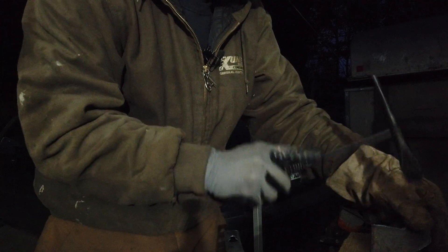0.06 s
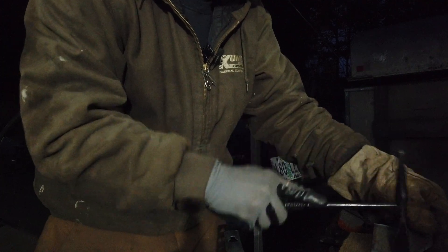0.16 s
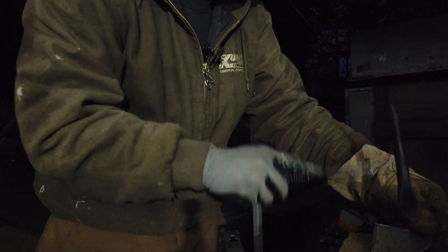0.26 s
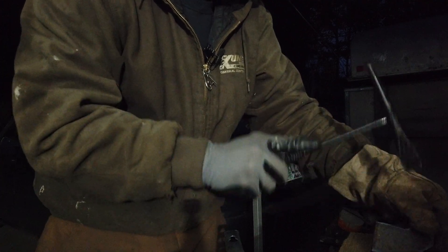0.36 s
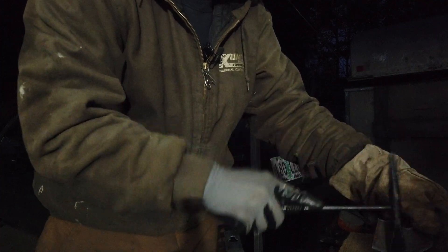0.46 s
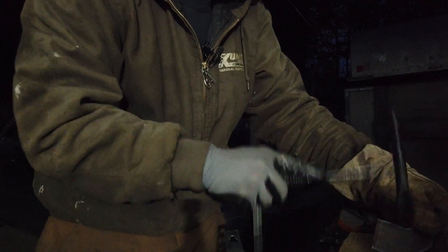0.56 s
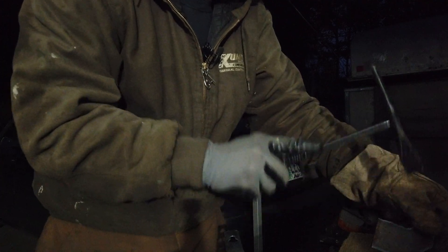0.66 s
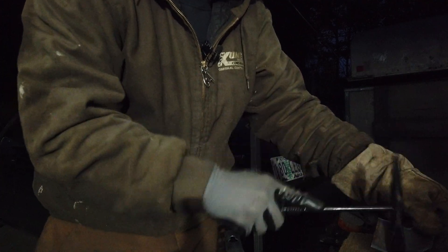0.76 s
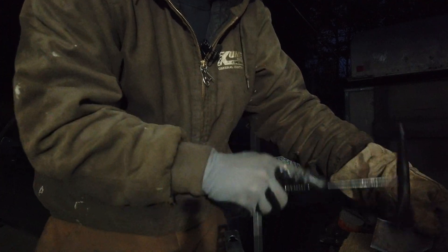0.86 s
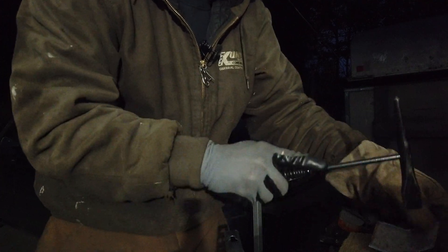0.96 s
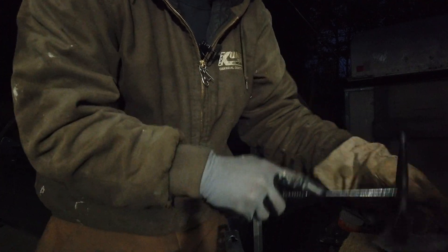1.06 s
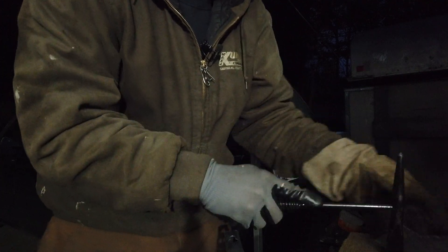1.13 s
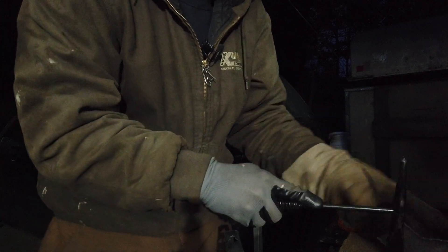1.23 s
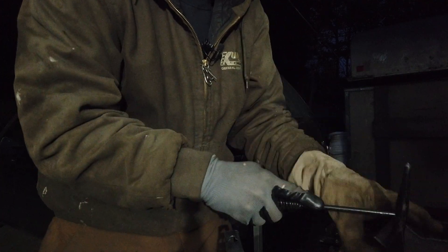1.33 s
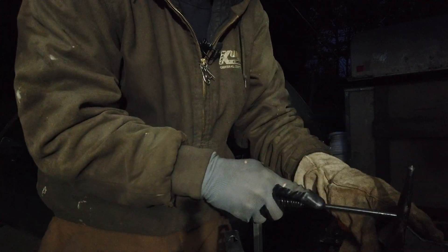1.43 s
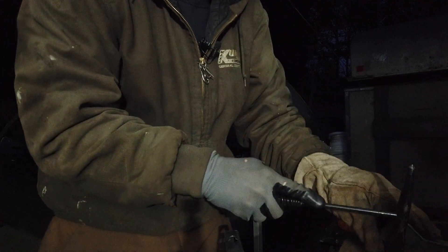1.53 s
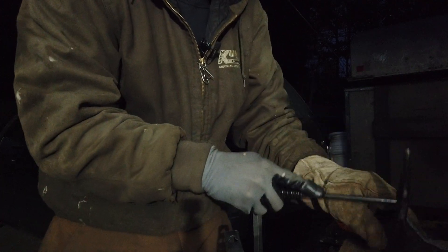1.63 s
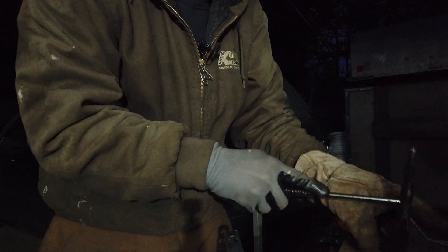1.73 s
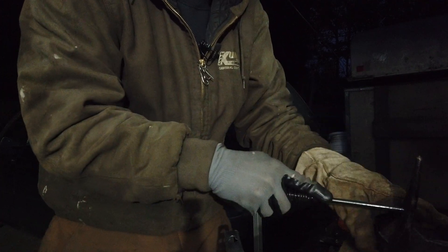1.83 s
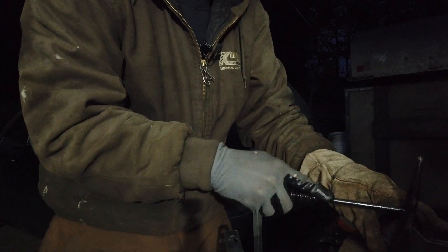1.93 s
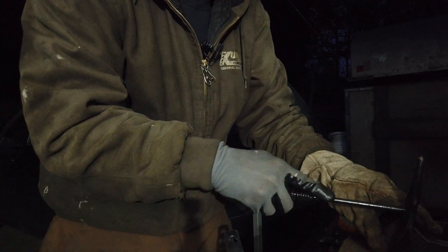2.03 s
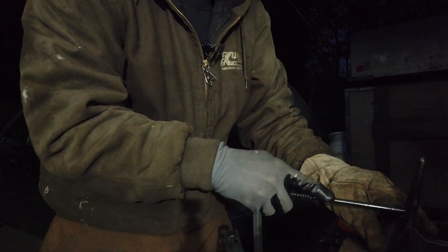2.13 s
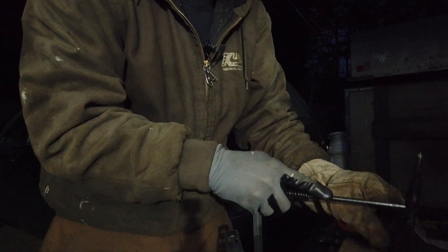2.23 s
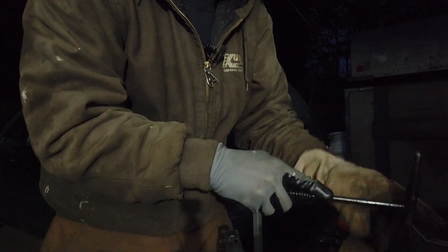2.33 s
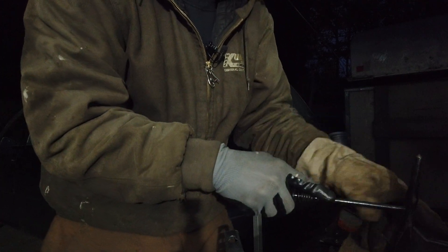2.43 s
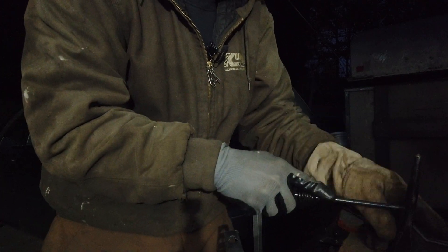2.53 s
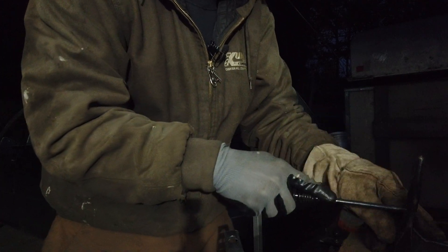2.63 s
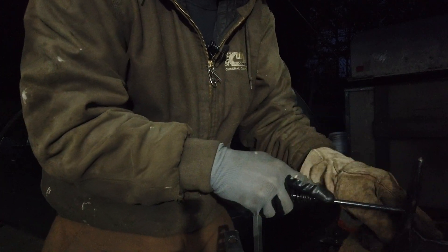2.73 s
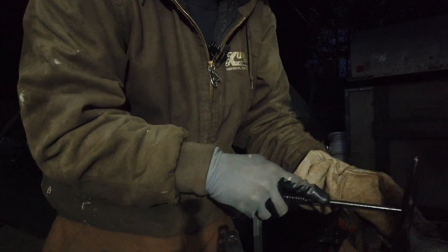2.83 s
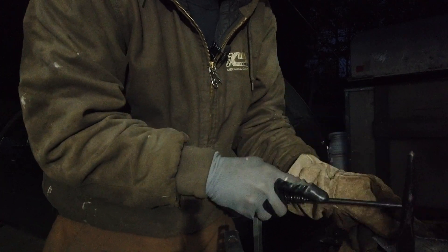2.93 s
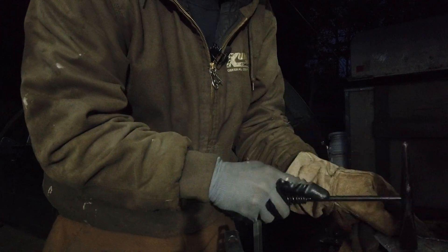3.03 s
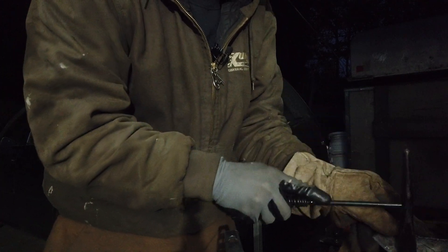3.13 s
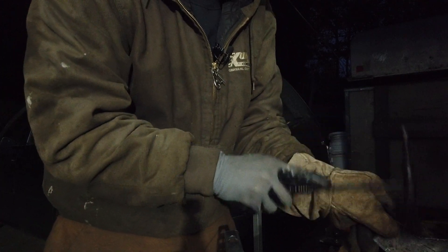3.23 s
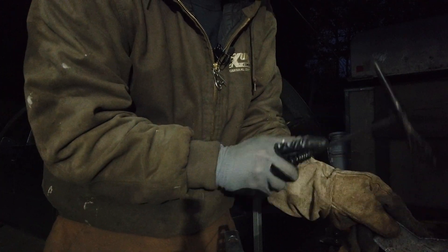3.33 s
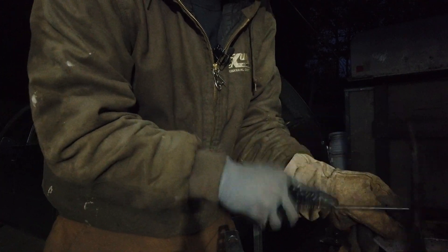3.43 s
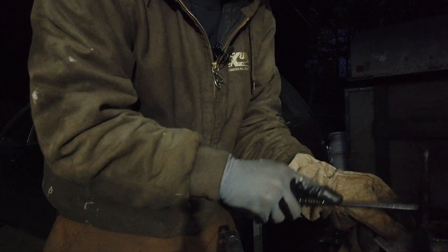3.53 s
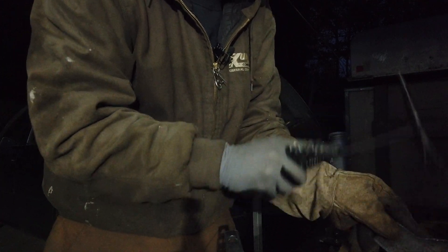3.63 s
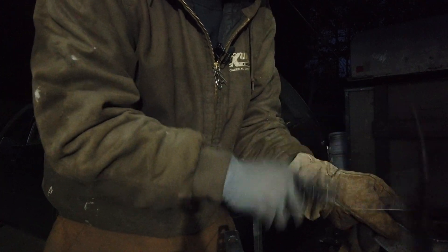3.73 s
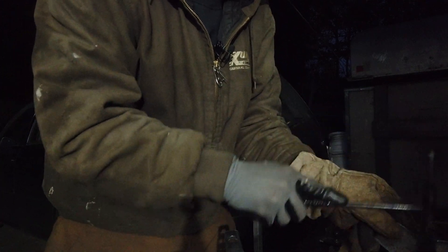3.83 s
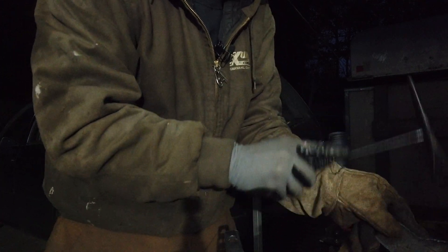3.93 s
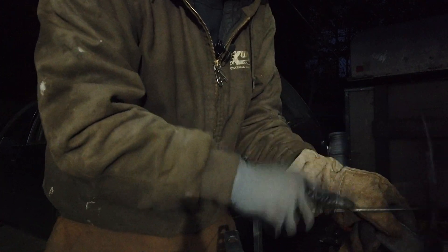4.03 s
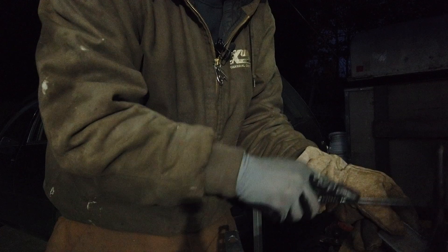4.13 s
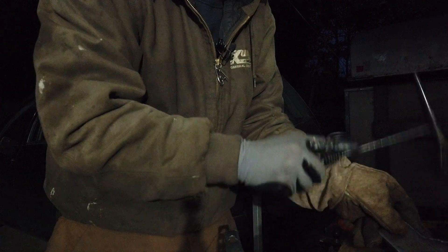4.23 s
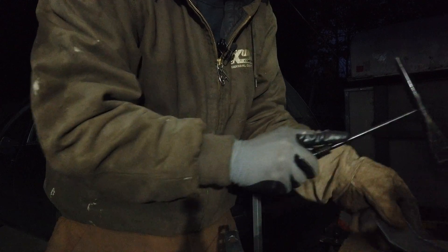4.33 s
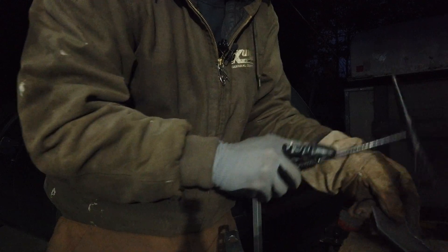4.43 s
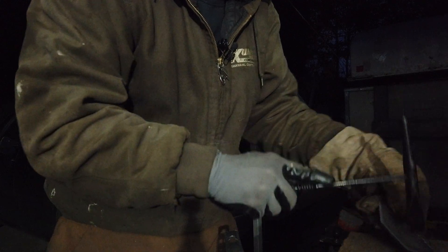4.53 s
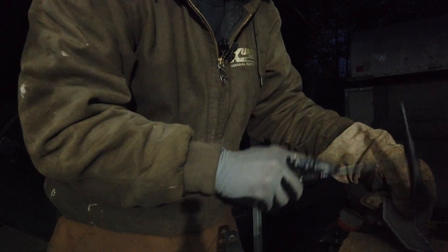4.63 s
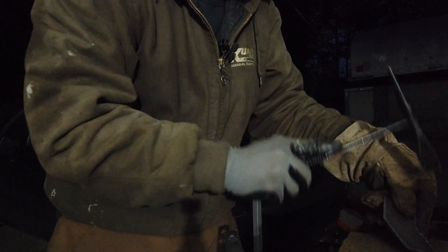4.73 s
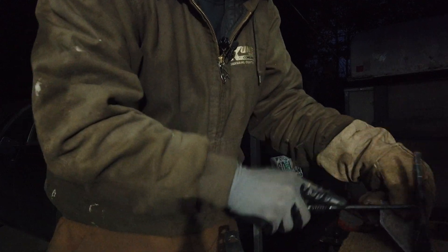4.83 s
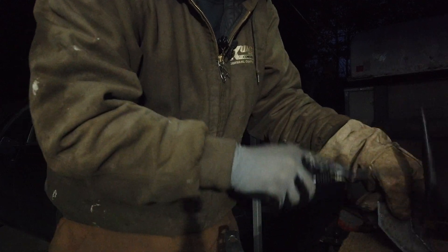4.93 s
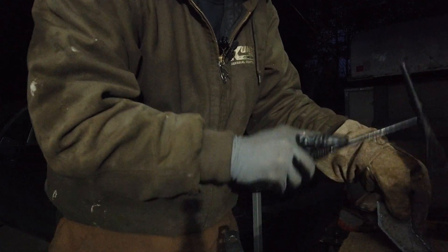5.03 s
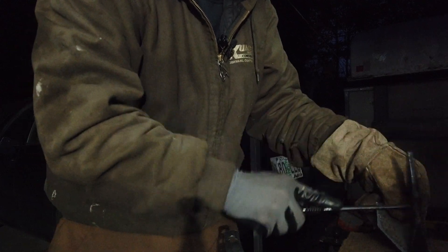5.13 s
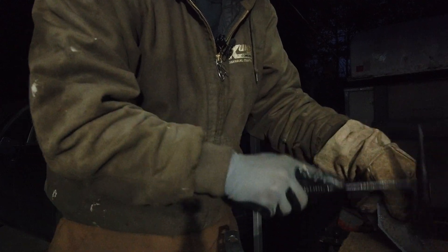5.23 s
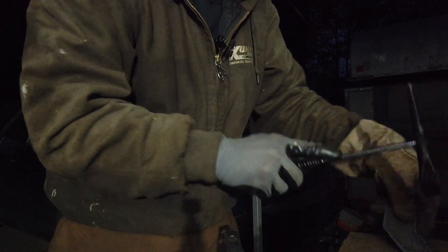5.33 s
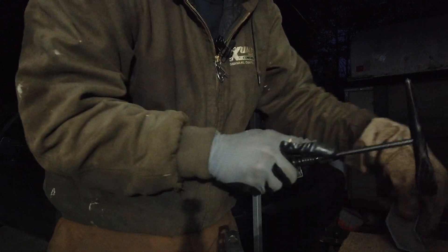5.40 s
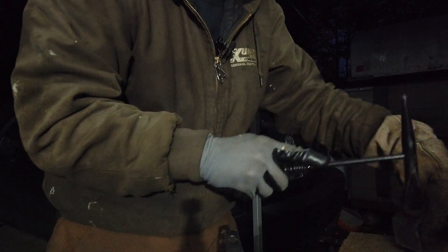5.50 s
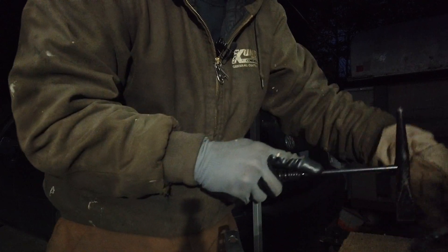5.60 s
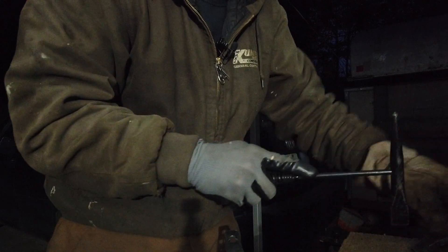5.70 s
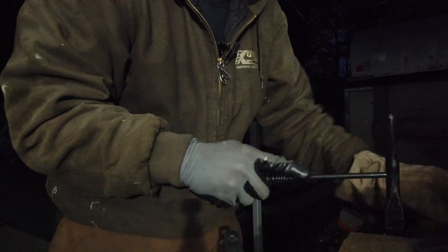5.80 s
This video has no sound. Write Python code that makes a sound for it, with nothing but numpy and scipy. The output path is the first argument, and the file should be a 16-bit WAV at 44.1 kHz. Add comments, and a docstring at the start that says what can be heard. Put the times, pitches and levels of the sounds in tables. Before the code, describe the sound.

Close to the microphone in a small workshop, a steel hammer cracks against a metal plate on a bench: three quick, knocking blows, then a lighter ringing one. A pause holds tiny ticks and glove scuffs, then a brighter clink leads into three louder, evenly spaced strikes, a short gap and two more. Faint hum, rumble and hiss sit underneath.

```python
"""A steel chipping hammer strikes the edge of a cut plate held on a bench in a small workshop.
Each blow is a burst of shaped noise (the crack), fading sine tones (the hammer head), and a knock and chatter
of plate and bench; the head's lowest tones fade faster once it touches the work again.
Between the heavy blows come light touches, and a glove's scuffs with a tap and a low knock, of gritty noise.
A faint wavering hum, rumble, air and hiss fill the room; the microphone is close."""
import sys
import numpy as np
from scipy import signal
from scipy.fft import rfft, irfft
from scipy.io import wavfile
from scipy.ndimage import uniform_filter1d, minimum_filter1d, map_coordinates

SR = 44100
rng = np.random.default_rng(int(sys.argv[2]) if len(sys.argv) > 2 else 0)


def file_out(sig):
    """Save sig as 16-bit WAV at sys.argv[1]."""
    # one column per channel
    cols = np.atleast_2d(sig).T
    # limit, then scale
    lim = np.clip(cols, -1, 1)
    pcm = np.round(lim * 32767).astype(np.int16)
    wavfile.write(sys.argv[1], SR, pcm)


def field_ratio(decibels):
    """Amplitude ratio for a level in dB (20 dB per decade); scalars and array-likes work."""
    return 10 ** (np.asarray(decibels, dtype=float) / 20)


N = 258426


def unit(x):
    """Scaled to rms 1."""
    return x / np.sqrt(np.mean(x ** 2) + 1e-20)


def curves(rows):
    """One value per sample for each column after the time."""
    s, *cols = np.transpose(rows)
    return [np.interp(np.arange(N) / SR, s, c) for c in cols]


def along(points, hz):
    """Reads a curve of (Hz, value) points on a log frequency axis."""
    f, v = np.transpose(points)
    return np.interp(np.log(hz + 1), np.log(f + 1), v)


def noise(points, size):
    """Noise of rms 1 whose spectrum has the given shape."""
    hz = np.fft.rfftfreq(size, 1 / SR)
    spectrum = rfft(rng.standard_normal(size)) * field_ratio(along(points, hz))
    return unit(irfft(spectrum, size))


def wobble(rate):
    """A smooth random curve through rate random points a second."""
    points = rng.standard_normal(int(N * rate / SR) + 4)
    return map_coordinates(points, [np.arange(N) * rate / SR])


def hiss():
    """Broad patchy hiss with narrow bands that come and go."""
    # shape of the broad hiss: f/Hz, level/dB per Hz
    hiss_shape = [(1760, -40.5), (3000, -12), (3340, -5.5), (4400, -6), (4720, 0), (5030, 0.5), (5920, 0),
                  (6400, 1.5), (7270, 2.5), (9380, -4), (11900, -1.5), (14300, -5.5), (15200, -2),
                  (15750, 0), (16000, -45.5)]
    # narrow bands standing out of the hiss: f/Hz, width/Hz, typical level/dB
    whistles = [(5126, 92, -8), (6530, 34, -7), (7204, 53, 0.5), (8200, 77, -5), (12600, 35, -12),
                (12200, 61, -5.5), (15200, 53, -21), (15400, 100, -11)]
    bands = 0
    for hz, width, db in whistles:
        shape = [(hz - 3 * width, -40), (hz - width / 2, -3), (hz + width / 2, -3), (hz + 3 * width, -40)]
        bands = bands + field_ratio(db + 4.1 * wobble(3.5)) * noise(shape, N)
    z = signal.stft(noise(hiss_shape, N) + field_ratio(-11.5) * bands, nperseg=256)[2]
    # random louder and softer patches, smoothed over frequency and then over time
    patches = uniform_filter1d(rng.standard_normal(z.shape), size=3, axis=0)
    patches = uniform_filter1d(patches, size=16, axis=1)
    patchy = signal.istft(z * field_ratio(2.2 * unit(patches)), nperseg=256)[1]
    return unit(patchy[:N])


def machine_hum():
    """A tone and its octave, wavering in pitch and level."""
    # machine hum: t/s, typical level/dB
    hum_levels = [(0, -64), (2.2, -65), (2.5, -54), (2.8, -78), (3.1, -59.5), (3.3, -50.5), (3.8, -53),
                  (4.4, -73.5), (4.55, -60), (5.2, -57.5), (5.35, -62.5), (5.86, -63)]
    (hum_db,) = curves(hum_levels)
    hum_hz = 102.7 + 1.2 * wobble(3.9)
    turn = 2 * np.pi * np.cumsum(hum_hz) / SR
    return field_ratio(hum_db + 1.8 * wobble(16)) * (np.sin(turn) + field_ratio(-12.5) * np.sin(2 * turn))


def background():
    """Rumble, air and hiss rise and fall together under the hum; part of the hiss differs left and right."""
    # overall swing of the shop noise: t/s, level/dB
    floor_levels = [(0, -60), (1, -61), (1.7, -59.5), (2.8, -57), (3.43, -54), (3.65, -56.5), (3.95, -63),
                    (5.86, -62)]
    # shape of the rumble: f/Hz, level/dB per Hz
    rumble_shape = [(12, -40), (20, -18.5), (59, 9.5), (135, -0.5), (195, 3), (242, -5), (500, -27),
                    (650, -53.5), (1100, -120)]
    # shape of the air noise: f/Hz, level/dB per Hz
    air_shape = [(150, -24.5), (250, -1), (504, -10.5), (923, -8.5), (1230, -15), (2550, -24.5),
                 (4500, -29), (5850, -47), (9900, -120)]
    # shape of the hiss that differs left and right: f/Hz, level/dB per Hz
    side_shape = [(880, -80.5), (1500, -50), (2940, -31.5), (3220, -8), (7930, -1.5), (14500, -6),
                  (16000, -10.5), (16500, -30.5)]
    (level_db,) = curves(floor_levels)
    rumble = field_ratio(0.5 + 2.8 * wobble(3.9)) * noise(rumble_shape, N)
    # the air swings wider than the rest: 0.4 dB extra per dB
    air_db = -4 + 0.4 * (level_db - level_db.mean()) + 2.4 * wobble(6.6)
    air = field_ratio(air_db) * noise(air_shape, N)
    hiss_swing = field_ratio(0.76 * wobble(2.9))
    mid = hiss_swing * hiss()
    side = hiss_swing * field_ratio(-6.5) * noise(side_shape, N)
    return machine_hum() + field_ratio(level_db) * (rumble + air + mid + np.array([side, -side]))


def scuffs():
    """Scuffs, with a short tap and a low knock among them: short gritty noises round a broad resonance."""
    # scuffs, a tap (3.18 s) and a low knock (5.706 s): t/s, relative level/dB, centre f/Hz, length/s
    scuffs_and_taps = [(1.107, -49.5, 1270, 0.097), (1.338, -44, 390, 0.013), (1.557, -42, 1075, 0.019),
                       (1.725, -46.5, 2150, 0.033), (2.3, -48.5, 2820, 0.039), (2.511, -46, 2000, .034),
                       (2.876, -46, 1157, 0.0055), (2.887, -41, 1256, 0.016), (2.947, -46.5, 1534, 0.038),
                       (3.18, -30.5, 1227, 0.0062), (3.195, -39.5, 1190, 0.015), (3.245, -26.5, 1776, .018),
                       (3.389, -48, 904, .017), (4.295, -52, 1810, .23), (4.745, -49, 1410, 0.014),
                       (5.706, -31, 460, 0.0042), (5.711, -41.5, 813, .029), (5.75, -44, 1500, 0.1),
                       (5.787, -42, 1330, 0.022), (5.818, -44.5, 1480, 0.019)]
    out, t = np.zeros(N + SR), np.arange(SR // 2) / SR
    for s, db, hz, length in scuffs_and_taps:
        shape = [(hz / 5, -40), (hz / 1.83, -12), (hz, 0), (hz * 1.3, -10), (hz * 1.92, -14), (hz * 3.9, -40)]
        rub = noise(shape, size=len(t))
        grit = field_ratio(4.7 * unit(uniform_filter1d(rng.standard_normal(len(t)), size=50)))
        u = 3 * t / length
        swell_and_fade = u * np.exp(-u)
        out[round(s * SR):][:len(t)] += field_ratio(db - 3.5) * rub * grit * swell_and_fade
    return out[:N]


def thuds():
    """The low push of heavy blows through bench and floor: a broad low resonance, shaken once."""
    # pushes: t/s, level/dB before the fade, f/Hz
    pushes = [(0.277, -32, 179), (0.583, -32, 167.4), (0.88, -29.5, 172.2), (3.593, -36, 37.14),
              (3.597, -32.5, 149.1), (3.904, -27.5, 35.7), (3.903, -30, 130.9), (4.947, -30, 170),
              (5.252, -33, 134.4)]
    t60_s = 0.14
    out, t = np.zeros(N + SR), np.arange(SR // 2) / SR
    for s, db, hz in pushes:
        shape = [(hz / 4, -40), (hz / 1.6, -4), (hz * 0.76, -4), (hz * 4, -40)]
        push = np.sin(2 * np.pi * hz * t) + 0.98 * noise(shape, size=len(t))
        onset = 1 - np.exp(-t / 0.0016)
        out[round(s * SR):][:len(t)] += field_ratio(db - 60 * t / t60_s) * onset * push
    return out[:N]


def shop(x):
    """A new room tail for each sound: each frequency dies at its own speed."""
    # room decay: f/Hz, t60/s
    room_decay = [(150, 0.36), (1000, 0.27), (4000, 0.21), (12000, 0.3), (15700, .15), (16100, .02)]
    hz, t, z = signal.stft(rng.standard_normal(SR // 2), SR, nperseg=128)
    fade = field_ratio(-60 * t / along(room_decay, hz)[:, None])
    tail = signal.istft(z * fade, SR, nperseg=128)[1]
    delayed = np.pad(x, (250, 0))  # samples before the room answers
    return signal.fftconvolve(delayed, tail / np.linalg.norm(tail))


def ring(modes, t, spread_db, rough):
    """One fading sine per mode, at new strength for each blow; loose contact makes the phase wander."""
    hz, db, t60 = np.transpose(modes)[:, :, None]
    luck, turn = rng.standard_normal((2, len(modes), 1))
    steps = uniform_filter1d(rng.standard_normal((len(modes), len(t))), size=25, axis=1)
    wander = rough * np.cumsum(steps, axis=1) * np.sqrt(hz / SR) / 10
    return field_ratio(db + spread_db * luck - 60 * t / t60) * np.sin(2 * np.pi * hz * t + turn + wander)


def first_contact(t):
    """The crack: a noise burst that dies within milliseconds."""
    # shape of the crack's body: f/Hz, level/dB per Hz
    crack_shape = [(240, -35.5), (400, -15.5), (1640, 4), (2180, 1.5), (3300, 5), (4800, -7), (6240, -53),
                   (10600, -120)]
    return noise(crack_shape, size=len(t)) * field_ratio(-0.5 - 60 * t / 0.02)


def treble_splash(t):
    """Treble of the first contact: a very short burst, then slag skittering."""
    # shape of the splash: f/Hz, level/dB per Hz
    splash_shape = [(2530, -49), (4300, -16), (5360, -9.5), (5930, -15.5), (8120, -7), (9780, -16),
                    (12000, -14.5), (15700, -24.5), (16400, -50.5)]
    flutter = unit(uniform_filter1d(rng.standard_normal(len(t)), size=160))
    flakes = field_ratio(-60 * t / 0.2 + 4 * flutter)  # slag skitters after the burst
    burst = field_ratio(4 - 60 * t / 0.015)
    return noise(splash_shape, size=len(t)) * (burst + field_ratio(-21.5) * flakes)


def hammer_head(t, low_db, pair_db, cluster_db, upper_db, free):
    """The head's ringing tones; renewed contact takes up to 24 dB off the lowest pair."""
    # lowest pair, a close pair, a cluster of four, then upper modes: f/Hz, typical level/dB, t60/s
    head_modes = [(3369, -2, 0.22), (3477, -13.5, .2), (5390, -9.5, 0.062), (5350, 0.5, 0.032),
                  (6810, -16, 0.094), (6946, -11, 0.13), (6880, -21, 0.048), (8040, -17.5, 0.12),
                  (8070, -1, 0.03), (10710, -15.5, 0.02), (12300, -8.5, 0.035), (13220, -16, 0.05),
                  (15250, -26, .04)]
    damping_t60_s = 0.03
    lowest = field_ratio(low_db) * ring(head_modes[:2], t, spread_db=4.5, rough=0.3).sum(0)
    pair = field_ratio(pair_db) * ring(head_modes[2:4], t, spread_db=4.5, rough=0.585).sum(0)
    cluster = field_ratio(cluster_db) * ring(head_modes[4:8], t, spread_db=-0.5, rough=1.9).sum(0)
    upper = ring(head_modes[8:], t, spread_db=3.0, rough=2.2).sum(0)
    # the head touches the work again and loses its ring
    damped = field_ratio(-np.minimum(60 * np.maximum(t - free, 0) / damping_t60_s, 24))
    build_up = 1 - 0.25 * np.exp(-t / 0.0028)
    return lowest * damped * build_up + pair + cluster + field_ratio(upper_db) * (upper + treble_splash(t))


def plate_and_bench(t):
    """The knock of plate and bench, and the plate chattering on as fading noise."""
    # plate and bench: f/Hz, typical level/dB, t60/s
    bench_modes = [(250, -19, 0.16), (318, -7.5, 0.062), (366.6, -5.5, 0.12), (535.5, -3.5, 0.075),
                   (647, -19, .11), (780, -7, 0.096), (844.3, 2, 0.088), (988, -15, 0.15),
                   (1133, -29.5, 0.23), (1422, -14.5, 0.13), (1759, -9.5, .1), (1925, -15, 0.071),
                   (2140, -22.5, 0.1)]
    # shape of the chatter: f/Hz, level/dB per Hz
    rattle_shape = [(130, -37.5), (220, -8.5), (362, -4.5), (629, -10.5), (764, -7), (1190, -9.5),
                    (3310, -25.5), (6000, -33), (7800, -67.5), (13200, -120)]
    swell = (1 - np.exp(-t / 0.0043)) ** 2  # the heavy bench takes some ms to move
    knock = field_ratio(1) * ring(bench_modes, t, spread_db=-0.5, rough=0.87).sum(0)
    chatter = noise(rattle_shape, size=len(t)) * field_ratio(-60 * t / 0.12)
    return swell * (knock + chatter)


def contacts():
    """Blows and touches as rows: s, overall, knock, lowest pair, close pair, cluster, treble dB, s free."""
    # heavy blows: t/s, overall level/dB; then relative to it: bench knock/dB, head's lowest pair/dB,
    # head's close pair/dB, treble/dB; time the head rings free/s
    blows = [(0.277, -11, -9, -36, -25, -7.5, 0.043), (0.5813, -9, -7.5, -33, -41, -12, 0.04),
             (0.8791, -13.5, 0, -21, -30.5, -5.5, .02), (1.2594, -21.5, -18.5, 2.5, 1, -8, 0.078),
             (3.2281, -16.5, -23.5, 7.5, -18, -10, 0.0056), (3.5924, -4.5, -14, 2.5, -18.5, -8.5, .017),
             (3.9009, -1.5, -12.5, 1, -23, -5.5, 0.0075), (4.1973, -6, -4.5, -13.5, -15, -12.5, 0.021),
             (4.9479, -5, -9.5, -11.5, -6.5, -9.5, 0.0057), (5.2467, -6.5, -5.5, -26.5, -15, -15, 0.0053),
             (5.2612, -27.5, 7.5, -36.5, -23.5, -9, .025)]
    # light touches: t/s, overall level/dB, head's lowest pair/dB relative to it, time the head rings free/s
    touches = [(1.4719, -53, -30.5, 0.027), (1.806, -52, 5, 0.13), (1.916, -53.5, -18, .02),
               (2.012, -36.5, 6, 0.066), (2.052, -47, -6, .02), (2.2185, -42, 7.5, 0.0022),
               (2.2996, -38, -8.5, 0.015), (2.4853, -42, -11.5, .01), (2.522, -52, -10, 0.025),
               (2.6857, -56, -30, .02), (3.3072, -42.5, -24, .017), (4.7418, -53.5, -34, 0.019)]
    rows = []
    for s, db, knock_db, low_db, pair_db, treble_db, free in blows:
        cluster_db = -5 + 0.3 * low_db  # the cluster rings more when the lowest pair does
        rows.append((s, db, knock_db, low_db, pair_db, cluster_db, treble_db, free))
    for s, db, low_db, free in touches:
        knock_db = -23.5 - 0.75 * low_db  # a touch that rings the head knocks the bench less
        rows.append((s, db, knock_db, low_db, -31, -31, -15.5, free))
    return rows


def hammer():
    """Crack, ringing head, bench knock and chatter of every contact, with the room's answer."""
    out, t = np.zeros(N + 2 * SR), np.arange(SR // 2) / SR
    onset = 1 - np.exp(-t / 0.00039)
    for s, db, knock_db, low_db, pair_db, cluster_db, upper_db, free in contacts():
        head = hammer_head(t, low_db, pair_db, cluster_db, upper_db, free)
        strike = (first_contact(t) + head) * onset
        direct = field_ratio(db) * (strike + field_ratio(knock_db) * plate_and_bench(t))
        room = field_ratio(-18.5) * shop(direct)
        at = round(s * SR)
        out[at:at + len(direct)] += direct
        out[at:at + len(room)] += room
    return out[:N]


def scene():
    """Everything the microphone hears."""
    return background() + scuffs() + thuds() + hammer()


def band_limit(x):
    """A steep low-pass at the top of the band."""
    return signal.sosfilt(signal.butter(12, 16960, fs=SR, output="sos"), x)


def record(dry):
    """A limiter briefly holds loud blows down; the input stage rounds off the first peaks."""
    top_cut = signal.butter(12, 15900, fs=SR, output="sos")  # the top treble rolls off
    dry = signal.sosfilt(top_cut, dry)
    need = np.minimum(1, 0.71 / (np.abs(dry).max(0) + 1e-9))
    held = minimum_filter1d(need, size=91, origin=45)
    gain = uniform_filter1d(held, size=61, origin=30)  # looks only backwards, so the attack slips through
    limited = gain * dry
    knee, top = 4, 0.6  # sharpness of the bend, highest level let through
    rounded = limited / (1 + np.abs(limited / top) ** knee) ** (1 / knee)
    return band_limit(rounded)


dry = scene()
out = record(dry)
file_out(out)
```